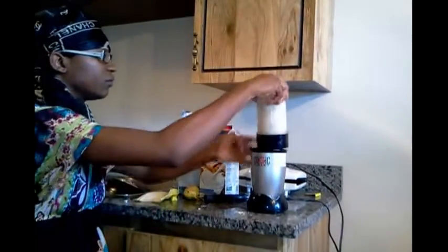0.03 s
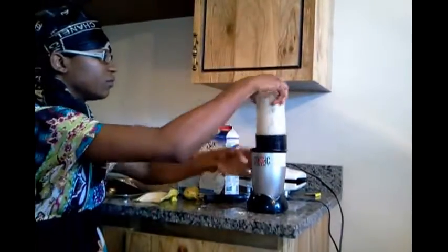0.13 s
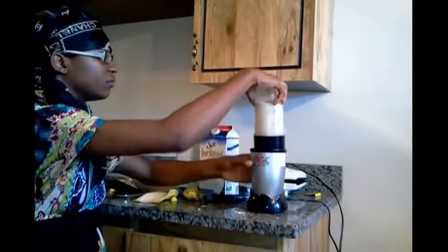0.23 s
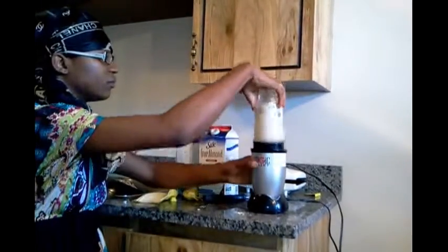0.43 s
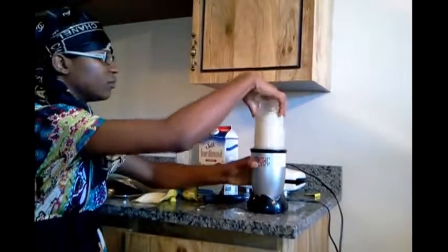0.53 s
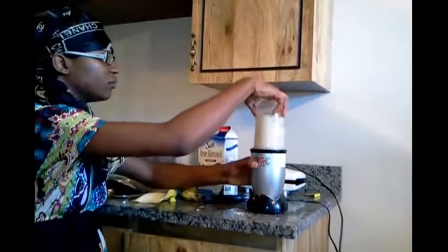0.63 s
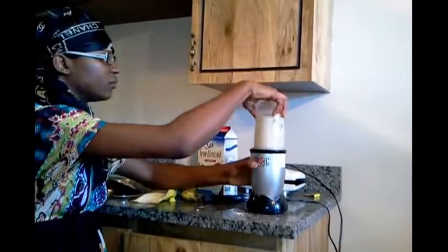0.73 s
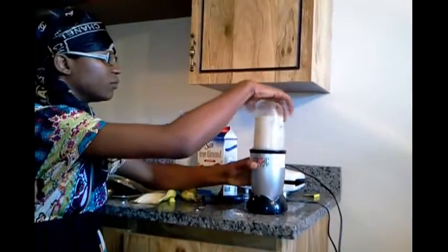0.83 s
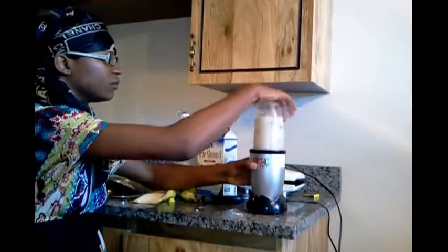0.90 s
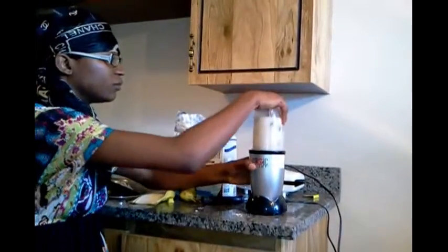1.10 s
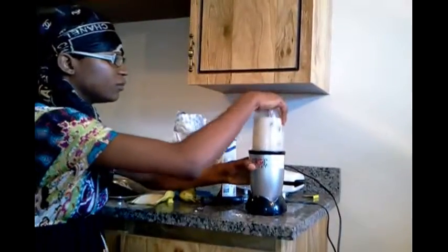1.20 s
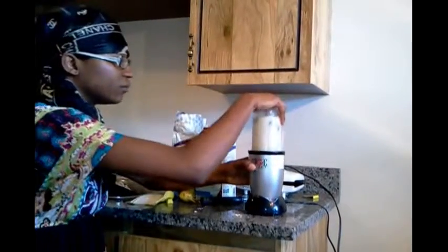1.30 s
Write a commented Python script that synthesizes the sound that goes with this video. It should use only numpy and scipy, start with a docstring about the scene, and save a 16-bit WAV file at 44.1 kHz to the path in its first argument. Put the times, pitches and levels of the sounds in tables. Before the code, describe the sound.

A plastic blender cup is fitted onto its base: two hollow knocks, a thud as it drops in, then a sharp clack and faint scrapes. The small kitchen is quiet apart from a faint hum.

```python
"""Two hollow plastic knocks come first: a filled blender cup bumps the rim of its motor base.
The cup slips, drops into the socket with a thud and clacks home; then its tabs scrape round.
Each touch makes the cup and the base ring, and a low boom swells in the room just after the thud.
The sounds die away in a small kitchen, over rubbing hands and a faint appliance hum and hiss."""
import sys
import numpy as np
from scipy import signal
from scipy.fft import rfft, irfft
from scipy.io import wavfile
from scipy.ndimage import uniform_filter1d

SR = 44100
rng = np.random.default_rng(int(sys.argv[2]) if len(sys.argv) > 2 else 0)


def wrap_up_sound(samples):
    """Save the sound to the file named by the first command line argument, as 16-bit audio."""
    columns = np.atleast_2d(samples).T
    # keep every value between -1 and 1, then stretch to whole-number steps
    tamed = np.clip(columns, -1, 1)
    steps = np.round(tamed * 32767).astype(np.int16)
    wavfile.write(sys.argv[1], SR, steps)


N = 59535
T = np.arange(N) / SR
AGE = T[:24000]  # seconds since a touch


# Each touch or bounce of the cup: t/s, thud/dB, knock/dB, knock pitch/Hz, wall/dB, struck spot/Hz,
# rim/dB, rim pitch/ratio, crack/dB, build-up/s, fade/s
TOUCHES = [ (0.1970, -47, -30, 688, -39.5, 1320, -44, 1.01, -40, 0.00076, 0.0055),
           (0.2091, -48.5, -47, 744, -41.5, 2484, -47.5, 1.01, -52, 0.0016, 0.0066),
           (0.3465, -68, -31, 597.6, -49.5, 2410, -50.5, 0.95, -44, 0.0055, 0.005),
           (0.355, -68, -42, 593, -48, 1925, -59, 0.89, -48, 0.0047, 0.01),
           (0.4420, -60, -45, 645, -57, 2390, -61, 1.13, -53, 0.0069, 0.011),
           (0.5789, -47.5, -39, 656, -35.5, 1155, -32.5, 1.013, -52.5, 0.00051, 0.0044),
           (0.6650, -20.5, -39, 670, -31.5, 1264, -27.5, 1.013, -41.5, 0.0024, 0.0042),
           (0.6780, -22, -29, 648, -28.5, 736, -32.5, 1.0, -30.5, 0.0019, 0.016),
           (0.802, -36.5, -22, 658, -31, 1042, -26, .92, -26, 0.0006, 0.0047),
           (0.8186, -36.5, -31.5, 645, -33, 1950, -34.5, 1.06, -36, 0.0007, 0.0052),
           (1.034, -48.5, -55, 542, -57, 2090, -51.5, .95, -50, 0.0017, 0.0069),
           (1.14, -44, -49, 652, -45.5, 2020, -46, 0.99, -53, 0.0023, 0.016)]

def cup_on_base(room_ring):
    """Each touch makes a soft thud, a hollow knock and a plastic clack, all at once."""
    out = 0
    for s, thud_db, knock_db, knock_hz, wall_db, spot_hz, rim_db, pitch, crack_db, rise, fade in TOUCHES:
        tail = room_tail(room_ring)
        slips = chatter(rise, fade)
        touch = from_db(thud_db) * in_room(base_thud(), tail, tail_db=-10)
        touch += from_db(knock_db) * in_room(hollow_knock(knock_hz, rise), tail, tail_db=-3)
        clack = [(wall_ring(slips, spot_hz), wall_db),
                 (rim_tick(slips, pitch), rim_db),
                 (crack(rise, fade), crack_db)]
        for part, db in clack:  # the hand over the cup blocks some of the direct sound
            touch += from_db(db) * in_room(part, tail, tail_db=1.5, direct_db=-6.5)
        out += starting(touch, s)
    return out


# Notes of the motor base and of the room's low boom: f/Hz, level/dB, ring time/s
BASE_NOTES = [(218, -14.5, 0.16), (257.3, -12.5, 0.15), (333.3, -12, 0.082), (388.8, 0.5, 0.11),
              (416, -6.5, 0.15), (513, -7, 0.19), (764, -11, 0.031)]
LOW_BOOM_NOTES = [(100.5, -0.5, 0.22), (135.3, -2.5, 0.27), (161.2, -3, 0.18)]

def base_thud():
    """The base rings at once; a low boom swells in the room just after the thud."""
    base = unit(ring(BASE_NOTES) * rising(0.006))
    boom = unit(ring(LOW_BOOM_NOTES) * rising(0.07))
    return base + from_db(-10.5) * boom


# Notes of the cup's hollow body: f/ratio to the knock pitch, level/dB, ring time/s
HOLLOW_NOTES = [(.85, -0.5, 0.019), (1.0, 1, 0.014), (1.14, -2, 0.02)]

def hollow_knock(hz, rise):
    """The hollow cup rings very briefly around one pitch."""
    return ring(HOLLOW_NOTES, hz) * rising(rise)


# Notes of the cup's wall: f/Hz, level/dB, ring time/s
WALL_NOTES = [(893, -3, 0.016), (1111, -5, 0.036), (1280, -13.5, 0.03), (1903, -4, 0.037),
              (2072, -12.5, 0.07), (2510, -9.5, 0.0082), (3016, -16, 0.011), (3380, -10, 0.033)]

def wall_ring(slips, spot_hz):
    """Tiny slips shake the wall, and the struck spot adds a note of its own."""
    return through(slips, ring(WALL_NOTES + [(spot_hz, 0, 0.03)]))


# Notes of the hard rim, before the pitch ratio shifts them: f/Hz, level/dB, ring time/s
RIM_NOTES = [(4064, -5, 0.0072), (4342, -1.5, 0.018), (4667, 0.5, 0.0066), (4890, -0.5, 0.016),
             (5130, -1.5, 0.0066), (5700, -7.5, 0.0063), (6086, -7.5, 0.011), (7900, -18, 0.0017)]

def rim_tick(slips, pitch):
    """Tiny slips make the hard rim give a high, short tick."""
    return through(slips, ring(RIM_NOTES, pitch))


# Tone of the crack, from low to high: f/Hz, level/dB
CRACK_TONE = [(300, -3.5), (800, -4.5), (1500, -5), (3000, -4.5), (5000, -9.5), (6500, -19.5),
              (8200, -33.5), (10000, -50.5)]

def crack(rise, fade):
    """The sharp noise of the touch itself, with no clear note."""
    return coloured(chatter(rise, fade), CRACK_TONE)


def chatter(rise, fade, slips_per_s=1300, slips_db=16):
    """A first touch, then a run of tiny slips that builds up and lets go."""
    first_touch = AGE == 0
    slips = (rng.random(len(AGE)) < slips_per_s / SR) * rng.standard_normal(len(AGE))
    slips = unit(slips * rising(rise) * np.exp(-AGE / fade))
    return evened(first_touch + from_db(slips_db) * slips, size=120)  # shakes all notes alike


# Each scrape of the tabs: t/s, level/dB, fade/s
TAB_SLIDES = [(0.819, -33, 0.0083), (1.148, -37.5, 0.004), (1.165, -45.5, 0.0048)]
# Notes of a tab: f/Hz, level/dB, ring time/s
TAB_NOTES = [(1092, -9.5, 0.06), (1964, -6, 0.016), (2190, -4.5, 0.0077), (2457, -6, 0.013),
             (3430, -16.5, 0.005), (5160, -4, 0.0039), (8160, -19.5, 0.0035)]

def tab_scrapes(room_ring):
    """The locking tabs ring as they slip a little way under the lip."""
    out = 0
    for s, db, fade in TAB_SLIDES:
        scrape = through(chatter(rise=0.0033, fade=fade), ring(TAB_NOTES))
        out += starting(from_db(db) * in_room(scrape, room_tail(room_ring), tail_db=1.5), s)
    return out


# Each sway under the push: t/s, level/dB, f/Hz, half-length/s
SWAYS = [(.24, -46, 55, 0.015), (0.602, -36.5, 32, 0.014)]

def push_sways():
    """Deep, brief sways as the cup is pushed down."""
    return sum(from_db(db) * np.sin(2 * np.pi * hz * (T - s)) * np.exp(-((T - s) / half_length) ** 2)
               for s, db, hz, half_length in SWAYS)


# Notes of the kitchen and cupboard: f/Hz, level/dB, ring time/s
ROOM_NOTES = [(137, -8.5, 0.15), (221, 4.5, 0.39), (255, -6, 0.39), (305, -14, 0.25), (401, -2, 0.085),
              (465, -2, 0.22), (522.4, -1.5, 0.3), (597, 8.5, 0.1), (688, 8, 0.24), (759, -4.5, 0.42),
              (1036, -2.5, 0.56)]

def standing_waves():
    """Sound bouncing back and forth between walls rings at a few notes."""
    return from_db(-20) * ring(ROOM_NOTES)


# How long the kitchen holds low and high sounds: f/Hz, ring time/s
ROOM_RING_TIMES = [(100, 0.21), (400, 0.29), (1000, 0.25), (2000, 0.28), (5000, 0.29), (9000, 0.29)]
# Tone of its blurred echoes: f/Hz, level/dB
WASH_TONE = [(100, -0.5), (650, 0.5), (900, -4.5), (1800, 0)]

def room_tail(room_ring, delay_s=0.0038, rise_s=0.00055):
    """What lingers for one position of the cup: the room's notes and a wash of blurred echoes."""
    white = rng.standard_normal(len(AGE))
    centres, ring_times = np.transpose(ROOM_RING_TIMES)
    wash = 0
    for share, ring_time in zip(np.eye(len(centres)), ring_times):
        band = shaped(white, lambda hz: np.interp(np.log(hz), np.log(centres), share))
        wash += band * dying(ring_time)
    onset = 1 - np.exp(-np.maximum(AGE - delay_s, 0) / rise_s)
    wash = coloured(evened(wash * onset, size=20), WASH_TONE)
    return unit((wash + room_ring) * onset)


# Echoes off the cupboard and walls: delay/s, strength/ratio
NEAR_ECHOES = [(.0058, 0.2), (0.013, 0.11), (0.0169, .24)]

def in_room(x, tail, tail_db, direct_db=0):
    """A sound arrives directly, then as near echoes, then as the room's tail."""
    echoes = sum(gain * starting(x, s)[:len(x)] for s, gain in NEAR_ECHOES)
    near = unit(from_db(direct_db) * x + echoes)
    far = from_db(tail_db) * unit(through(x, tail))
    return unit(near + far) * np.sqrt(0.02 * SR)  # average level 1 if packed into 20 ms


# How loud the rubbing is over time: t/s, level/dB
RUB_LEVELS = [(0, -104), (.2, -60), (.45, -49.5), (.56, -56.5), (.95, -49), (1.1, -56), (1.35, -55.5)]
# Its tone: f/Hz, level/dB
RUB_TONE = [(60, -10.5), (250, 6.5), (550, 10.5), (1000, 1.5), (1500, 0.5), (2200, 7), (3300, -5.5),
            (5000, 6), (7000, -24), (8500, -39), (10000, -57.5)]

def hand_rub():
    """Hands rub on plastic: a soft noise that swells and sinks."""
    return from_db(np.interp(T, *np.transpose(RUB_LEVELS))) * noise(RUB_TONE)


# Notes of the hum: f/Hz, level/dB
HUM_NOTES = [(119.5, -57), (162, -64), (212, -57.5), (242.5, -53.5), (298, -65), (769, -62)]

def appliance_hum(waver=0.2):
    """An appliance hums on a few notes, each wavering slowly."""
    slow = [(1, 0), (8, 0), (30, -40), (100, -100)]  # f/Hz, level/dB
    hum = 0
    for hz, db in HUM_NOTES:
        drift = 1 + waver * (noise(slow) + 1j * noise(slow))  # moves both loudness and phase
        note = np.exp(2j * np.pi * (hz * T + rng.random()))
        hum += from_db(db) * np.sqrt(2) * np.real(drift * note)
    return hum


# Tones of the room's hiss and of a thin whine in it: f/Hz, level/dB
HISS_TONE = [(25, -5), (60, 2), (90, -6.5), (160, -0.5), (240, 3), (330, -3.5), (600, -8.5), (1000, -13),
             (2400, -19), (3400, -24), (4400, -18), (5050, -18.5), (5700, -17), (7000, -25.5), (8500, -34),
             (10000, -60)]
WHINE_TONE = [(4200, -30.5), (4850, -12), (5030, 5), (5200, -22), (6000, -35.5)]

def room_hiss():
    """A faint, steady hiss with a thin, high whine."""
    return from_db(-50.5) * noise(HISS_TONE) + from_db(-64) * noise(WHINE_TONE)


def ring(notes, pitch=1):
    """A struck object rings with fading notes; every second one starts the opposite way."""
    return unit(sum((-1) ** k * from_db(db) * unit(np.sin(2 * np.pi * hz * pitch * AGE) * dying(seconds))
                    for k, (hz, db, seconds) in enumerate(notes)))


def rising(seconds):
    """Grow from silence towards full strength."""
    return 1 - np.exp(-AGE / seconds)


def dying(ring_time):
    """Fade by 60 dB over the ring time."""
    return np.exp(-np.log(1000) * AGE / ring_time)


def from_db(db):
    """Turn decibels into a multiplier."""
    return 10 ** (np.asarray(db) / 20)


def unit(x):
    """Scale to an energy of one."""
    return x / np.sqrt(np.sum(x ** 2) + 1e-20)


def starting(x, s):
    """Delay a sound by s seconds."""
    return np.pad(x, (int(s * SR), N))[:N]


def through(x, response):
    """Let a sound set an object or a room ringing."""
    return signal.fftconvolve(x, response)[:len(x)]


def noise(tone):
    """Steady noise with the given tone and an average (rms) level of 1."""
    return unit(coloured(rng.standard_normal(N), tone)) * np.sqrt(N)


def coloured(x, tone):
    """Turn a sound's lows and highs up or down, following a tone table."""
    points_hz, db = np.transpose(tone)
    return shaped(x, lambda hz: from_db(np.interp(np.log(hz), np.log(points_hz), db)))


def shaped(x, gain_at):
    """Give each frequency in a sound its own multiplier."""
    size = 2 * len(x)
    hz = np.maximum(np.fft.rfftfreq(size, 1 / SR), 1)
    return irfft(rfft(x, size) * gain_at(hz))[:len(x)]


def evened(x, size):
    """Smooth out chance humps in a sound's tone, averaging over `size` nearby frequencies."""
    spectrum = rfft(x, 2 * len(x))
    power = abs(uniform_filter1d(abs(spectrum) ** 2, size=size))
    return unit(irfft(spectrum / np.sqrt(power + 1e-12))[:len(x)])


def scene():
    """The cup and the kitchen's background, together in one channel."""
    room_ring = standing_waves()
    cup = cup_on_base(room_ring) + tab_scrapes(room_ring) + push_sways()
    return (cup + hand_rub() + appliance_hum() + room_hiss())[None]


def record(dry):
    """The loudest peaks are rounded off and the highest treble is cut steeply."""
    ceiling, stop_hz = 0.3, 10600
    rounded = dry / (1 + (dry / ceiling) ** 6) ** (1 / 6)
    return signal.sosfilt(signal.cheby2(14, 60, stop_hz, fs=SR, output="sos"), rounded)


dry = scene()
out = record(dry)
wrap_up_sound(out)
```